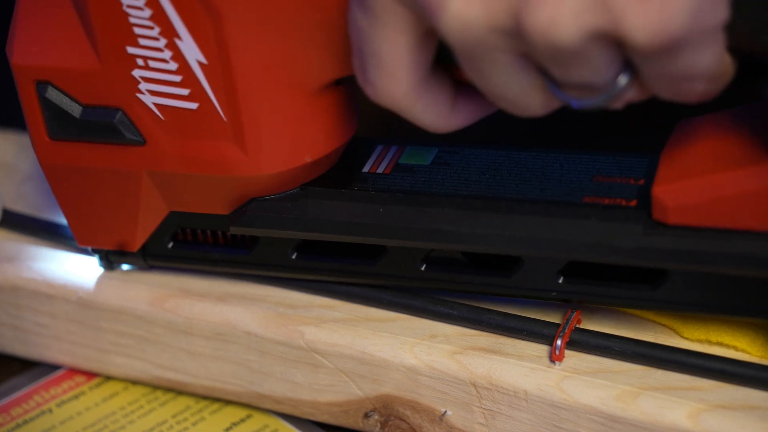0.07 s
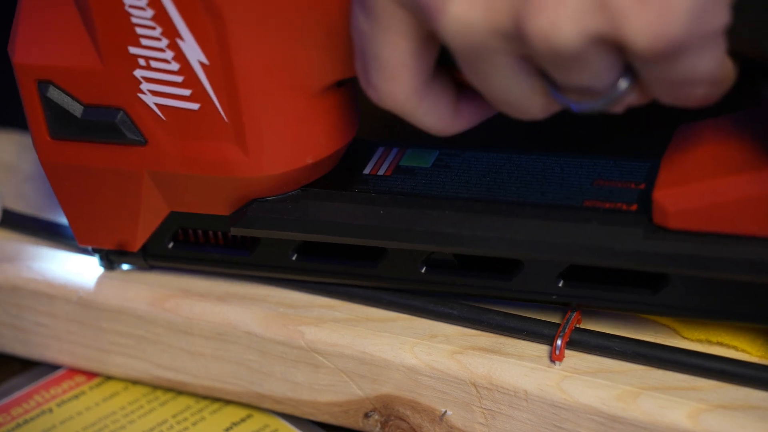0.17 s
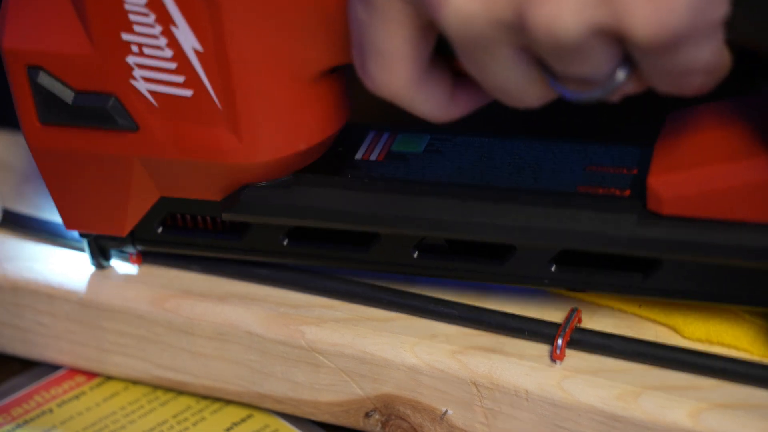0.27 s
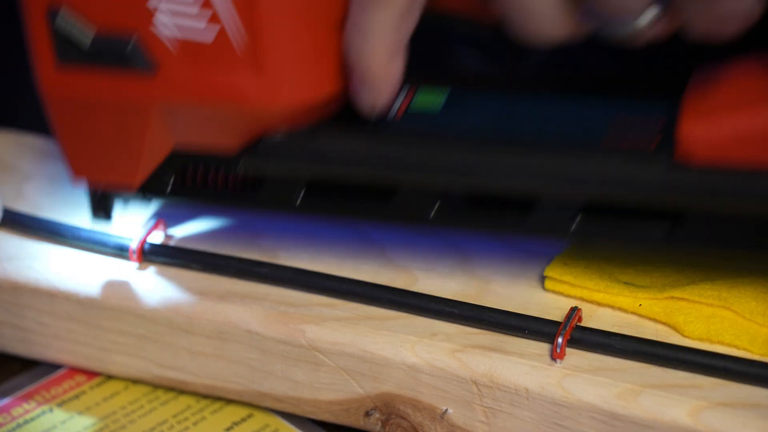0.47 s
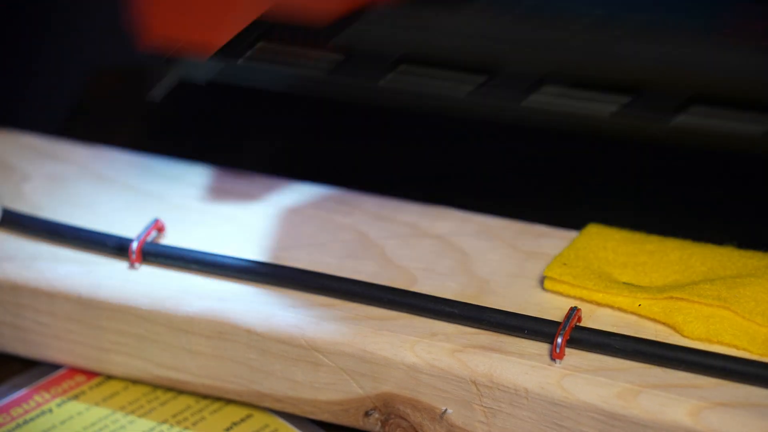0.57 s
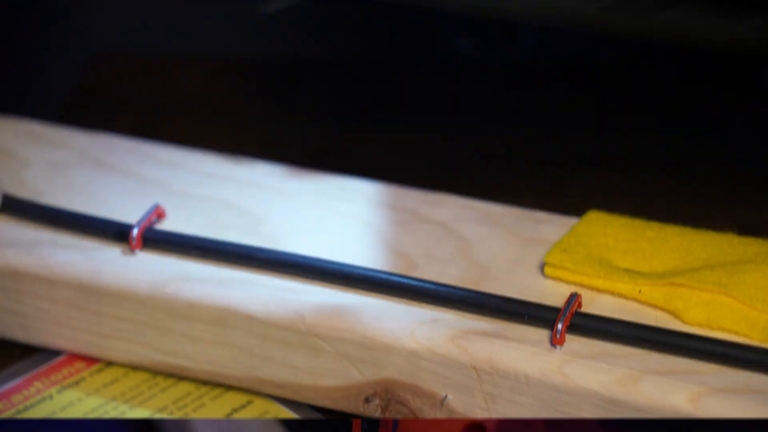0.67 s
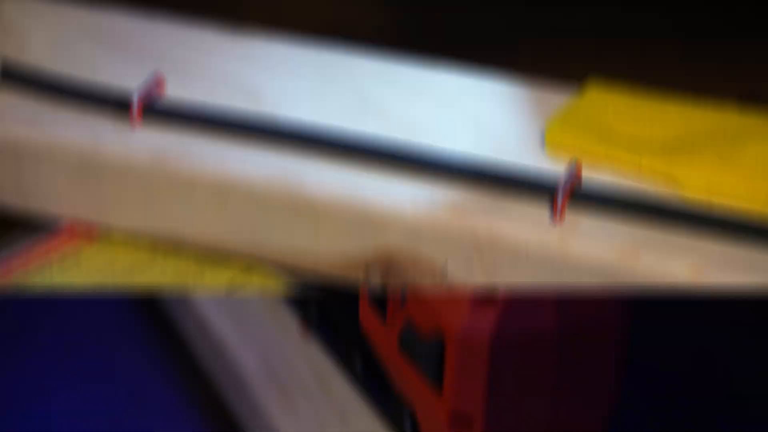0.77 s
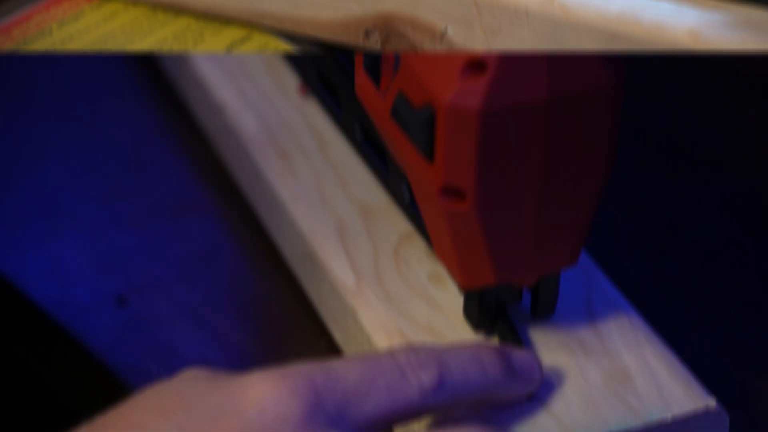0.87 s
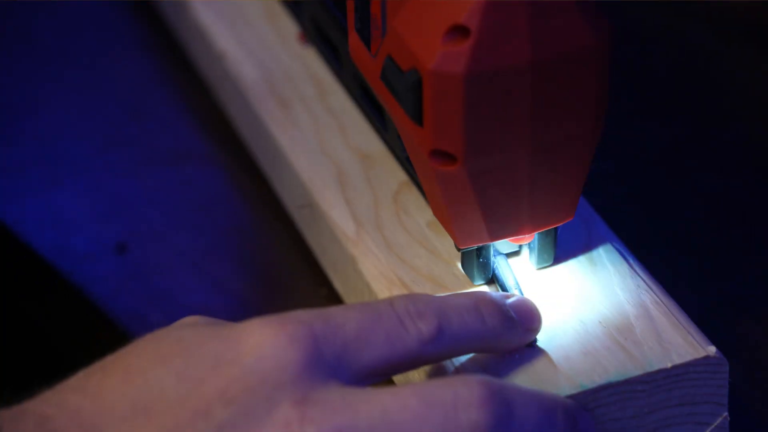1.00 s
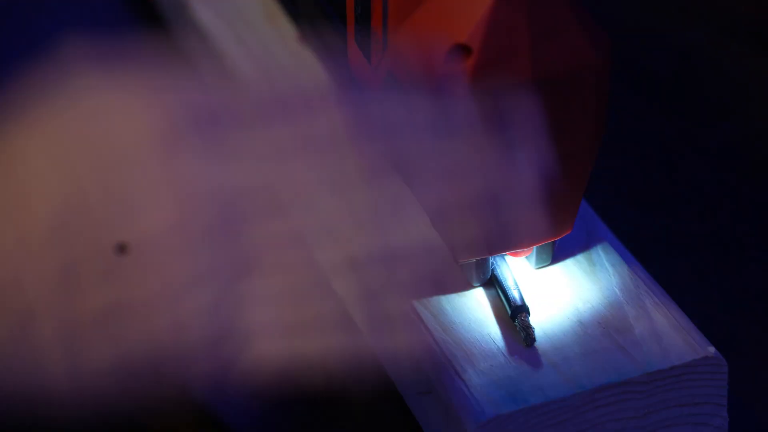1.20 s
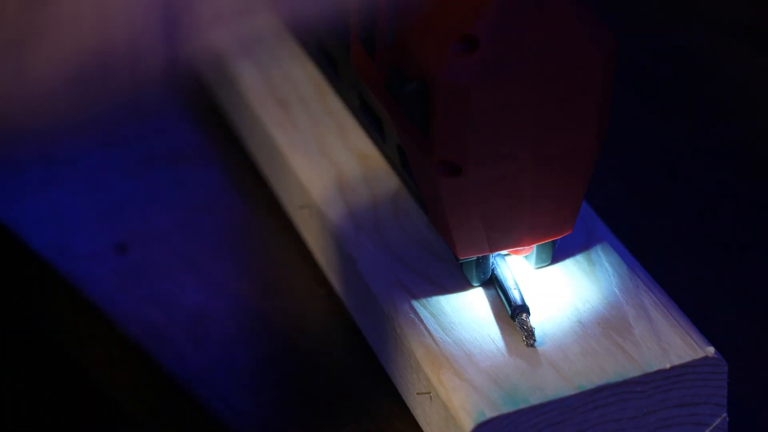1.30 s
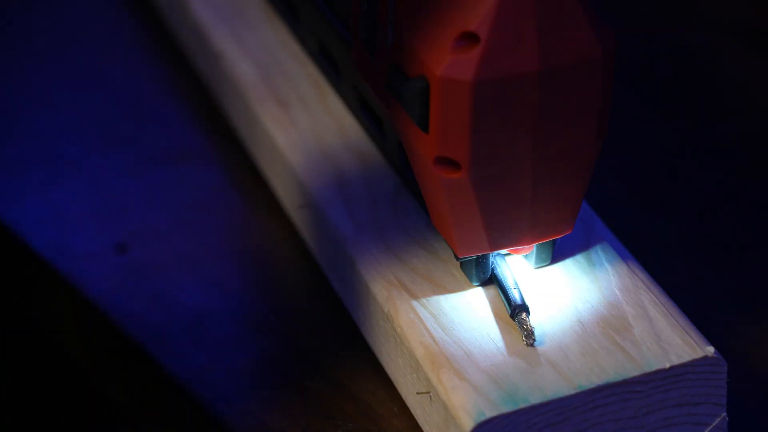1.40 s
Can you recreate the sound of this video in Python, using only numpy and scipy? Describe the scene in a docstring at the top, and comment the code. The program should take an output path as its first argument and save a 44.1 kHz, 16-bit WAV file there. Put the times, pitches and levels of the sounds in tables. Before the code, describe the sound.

A cordless stapler whirs briefly, then fires into a wooden board with a sharp crack and a low thud. Faint clicks, knocks and a dull bump follow as tool and board are handled, close up in a quiet workshop.

```python
"""A short motor whir and a sharp crack: a cordless stapler fires into a wooden board, close up.
Whining gears wind a spring, the striker hits the staple and rebounds, the board booms,
and the spring rings on as the motor stops. Then tool and board are handled in the small,
quiet workshop: light clicks, a short scuff and a dull bump."""
import sys
import numpy as np
from scipy import signal
from scipy.fft import rfft, irfft
from scipy.io import wavfile
from scipy.ndimage import uniform_filter1d

SR = 44100
rng = np.random.default_rng(int(sys.argv[2]) if len(sys.argv) > 2 else 0)


def generate_wav(signal):
    """Clip the signal to [-1, 1] and save it as 16-bit WAV at the path in sys.argv[1]."""
    frames = np.transpose(np.atleast_2d(signal))
    scaled = np.clip(frames, -1, 1) * 32767
    pcm = np.round(scaled).astype(np.int16)
    wavfile.write(sys.argv[1], SR, pcm)


N = 63945

FIRE_S = .2405  # the spring is let go
CONTACT_S = .0004  # attack of a hard knock


def undb(db):
    """Decibels to gain."""
    return 10 ** (np.asarray(db) / 20)


def since(start):
    """Seconds since a moment, zero before it."""
    return np.maximum(np.arange(N) / SR - start, 0)


def fall(start, t60):
    """Full level until a moment, then a decay of 60 dB every t60 seconds."""
    return np.exp(-np.log(1000) * since(start) / t60)


def rise(start, length):
    """Silence until a moment, then a smooth rise to full level."""
    return 1 - np.exp(-(since(start) / length) ** 2)


def hump(centre, width):
    """A smooth swell and fade around a moment."""
    return np.exp(-.5 * ((np.arange(N) / SR - centre) / width) ** 2)


def burst(start, t60, tail_db, tail_t60):
    """Envelope of a contact: a quick decay and the room's longer tail."""
    direct = rise(start, 0.001) * fall(start, t60)
    tail = undb(tail_db) * rise(start, 0.002) * fall(start, tail_t60)
    return np.hypot(direct, tail)


def colour(x, points):
    """Shape a sound with an EQ curve that rolls off steeply beyond its ends; rms 1."""
    hz, db = np.array(points, float).T
    f = np.maximum(np.arange(N // 2 + 1) * SR / N, 1)
    curve = undb(np.interp(np.log(f), np.log(hz), db))
    skirts = 1 / np.sqrt((1 + (hz[0] / 2 / f) ** 4) * (1 + (f / hz[-1] / 2) ** 8))
    y = irfft(rfft(x) * curve * skirts, N)
    return y / np.std(y)


def noise(points):
    """Coloured noise of rms 1."""
    return colour(rng.standard_normal(N), points)


def ring(start, modes):
    """Damped modes struck at one moment."""
    return sum(undb(db) * np.sin(2 * np.pi * hz * since(start)) * fall(start, t60)
               for hz, db, t60 in modes)


def room_tone():
    """The faint low rumble of the workshop."""
    # Room EQ. Each row: frequency in Hz, gain in dB.
    room_eq = [(25, -3.5), (60, 0), (150, -8.5), (700, -26.5), (15500, -39)]
    return undb(-64) * noise(room_eq)


def scuff():
    """A short, squeaky rub that swells into the first bump."""
    # Friction EQ. Each row: frequency in Hz, gain in dB.
    scuff_eq = [(300, -9), (1400, -10.5), (1700, 5.5), (1830, 0), (2050, -15), (7000, -47)]
    return undb(-48.5) * noise(scuff_eq) * rise(1.1, 0.046) * fall(1.177, t60=0.14)


def handling_knocks():
    """Each knock layers a wooden thud, a plastic clack and a tick that rings the metal magazine."""
    # Knocks. Each row: start in seconds, wood in dB, plastic in dB, clack pitch ratio, metal in dB.
    knocks = [(0.7011, -39, -43, 0.94, -47), (.731, -51, -50, 1.25, -53.5), (0.7620, -49, -41, 1.14, -50),
              (0.788, -76, -48.5, 1.27, -48.5), (0.828, -44.5, -56, 1.03, -85),
              (0.858, -57, -47, 1.06, -76), (0.9594, -49, -41.5, 0.98, -75), (0.978, -46, -64, 0.46, -79),
              (1.1719, -35.5, -43, 1.116, -63), (1.343, -65, -50.5, 0.93, -80),
              (1.3718, -57.5, -39, 1.145, -75)]
    # EQs of wood, plastic and metal. Each row: frequency in Hz (before any pitch ratio), gain in dB.
    wood_eq = [(90, -15), (220, -7.5), (272, 1.5), (310, -10), (370, -5.5), (560, -5), (750, -18.5),
               (1200, -26), (3000, -47.5)]
    clack_eq = [(300, -1.5), (900, -7.5), (1250, 0), (1800, -8), (2300, -11.5), (3200, -27.5), (7000, -60)]
    tick_eq = [(1500, -11), (3400, 2), (8500, -8.5), (15500, -23)]
    # Ring of the plastic shell. Each row: base frequency in Hz, relative level in dB, t60 in seconds.
    shell_modes = [(1567, 1.5, 0.023)]
    # Ring of the magazine. Each row: frequency in Hz, relative level in dB.
    magazine_modes = [(1290, 0), (3110, -13), (5040, -19.5)]
    out = 0
    for start, wood_db, plastic_db, pitch, metal_db in knocks:
        clack = noise([(hz * pitch, db) for hz, db in clack_eq])
        clack *= burst(start, t60=.028, tail_db=-12.5, tail_t60=.36)
        shell = ring(start, [(hz * pitch, db, t60) for hz, db, t60 in shell_modes])
        plastic = clack + rise(start, CONTACT_S) * shell
        tick = noise(tick_eq) * burst(start, t60=0.021, tail_db=-13.5, tail_t60=0.16)
        metal = tick + ring(start, [(hz, db, 0.091) for hz, db in magazine_modes])
        wood = noise(wood_eq) * burst(start, t60=0.26, tail_db=-10.5, tail_t60=0.64)
        out += undb(wood_db) * wood + undb(plastic_db) * plastic + undb(metal_db) * metal
    return out


def light_ticks():
    """Tiny, bright ticks: the trigger clicks, then the mechanism ticks faintly after the shot."""
    # Ticks. Each row: start in seconds, level in dB, centre frequency in Hz.
    ticks = [(0.104, -57.5, 7900), (.517, -65, 11000), (0.941, -68.5, 3870)]
    out = 0
    for start, db, hz in ticks:
        band = noise([(hz / 2, -20), (hz, 0), (hz * 2, -20)])
        out += undb(db) * band * (since(start) > 0) * fall(start, t60=0.068)
    return out


def board_bumps():
    """Dull bumps ring the board's low modes with a soft attack."""
    # Bumps. Each row: start in seconds, level in dB.
    bumps = [(1.172, -20), (1.2203, -29.5), (1.281, -43), (1.385, -43.5)]
    # Modes of the bumped board. Each row: frequency in Hz, relative level in dB, t60 in seconds.
    modes = [(92.9, -20, 1), (137.8, -8, 0.28), (167, -2, 0.16), (271.4, 0, 0.094), (363, -13, 0.12)]
    return sum(undb(db) * rise(start, 0.0069) * ring(start, modes) for start, db in bumps)


def motor():
    """Gear teeth whine upward as they wind the spring, and rattle and hiss until the motor brakes."""
    # EQs of the gears' rattle in the housing and their hiss. Each row: frequency in Hz, gain in dB.
    rattle_eq = [(130, -15), (260, -5), (750, -15.5), (1100, -4), (1500, -6.5), (1850, 0.5), (2500, -7),
                 (3150, -0.5), (3900, -8), (6000, -20.5), (16000, -44.5)]
    hiss_eq = [(4500, -7.5), (6500, 0), (10300, 3.5), (12500, -15.5), (16000, -21)]
    on_s, off_s, spin_up_s = .1065, 0.4, .055
    full_mesh_hz, roughness, teeth_per_turn = 2022, .012, 6.4
    speed = 1 - np.exp(-since(on_s) / spin_up_s)
    wobble = uniform_filter1d(rng.standard_normal(N), size=120)
    mesh_hz = full_mesh_hz * speed * (1 + roughness * wobble / np.std(wobble))
    phase = 2 * np.pi * np.cumsum(mesh_hz) / SR
    throb = 1 + .35 * np.cos(phase / teeth_per_turn)
    tone = np.sqrt(2) * (np.sin(phase) + undb(-6) * np.sin(2 * phase))
    whine = undb(-29.5) * speed * throb * tone * fall(FIRE_S, t60=0.42)  # fades once unloaded
    tooth = (phase / (2 * np.pi)).astype(int)
    tooth_force = undb(3.4 * rng.standard_normal(N))[tooth]
    contacts = rng.standard_normal(N) * tooth_force * (1 + np.cos(phase)) * (speed > 0)
    rattle = undb(-28.5) * colour(contacts, rattle_eq)
    hiss = undb(-40.5) * rise(on_s, 0.038) * colour(contacts, hiss_eq)
    running = rise(on_s, 0.041) * fall(off_s, t60=0.16)
    return running * (rattle + hiss + whine)


def drive_spring():
    """The released spring hums on after the shot."""
    # Spring modes. Each row: frequency in Hz, level in dB, t60 in seconds.
    modes = [(143, -48.5, 1), (215.3, -33.5, 1.1), (289, -35, 1.1), (439, -30.5, .72), (525, -43, .6)]
    return ring(FIRE_S, modes)


def shudder():
    """The housing trembles as the spring tightens, then the shot shakes tool and bench."""
    # Shudder EQ. Each row: frequency in Hz, gain in dB.
    shudder_eq = [(90, -21), (190, 4.5), (230, -2.5), (320, -5), (450, -1), (650, -8), (900, -13),
                  (1150, -14), (1700, -9.5), (2600, -30.5)]
    strain = undb(-37.5) * rise(0.17, 0.0043)
    recoil = undb(-17) * rise(FIRE_S, 0.02)
    return (strain + recoil) * noise(shudder_eq) * fall(0.37, t60=0.22)


def board_boom():
    """The board booms after the shot; the tool lands and damps it, and the boom dies as it lifts off."""
    # Modes of the board on its bench, and the hollow knock of the landing tool.
    # Each row: frequency in Hz, relative level in dB, free t60 in seconds.
    board_modes = [(98, -25.5, 0.92), (189.3, 1, 0.5), (265.6, -7, 0.45), (364, -18, 0.94),
                   (448, -17.5, 0.4), (563, -17.5, 0.25)]
    landing_modes = [(446.5, -13, .09)]
    start, swell_s, land_s, lift_s = FIRE_S + .019, 0.033, .338, 0.47
    boom = undb(-4.5) * rise(start, swell_s) * ring(start, board_modes)
    damping = undb(-3.5 * rise(land_s, swell_s)) * fall(lift_s, t60=0.19)
    return boom * damping + ring(land_s, landing_modes)


def striker_blows():
    """The striker hits its stop and rebounds, clattering and ringing the nose."""
    # Blows. Each row: start in seconds, ring in dB, ring time ratio, pitch ratio, clatter in dB.
    blows = [(0.2423, -14.5, 1.8, 1.23, -13), (0.2427, 0, 0.71, 0.99, -3.5),
             (0.2533, -9.5, 1.4, 1.07, -26.5), (0.27, -13.5, 0.4, 1.32, -22),
             (0.2911, 1.5, 0.28, 1.14, -19), (0.3125, 0, 0.24, 1.11, -28), (0.447, -27.5, 0.45, 1.1, -32.5)]
    # Nose and housing modes. Each row: base frequency in Hz, relative level in dB, base t60 in seconds.
    nose_modes = [(586.5, -10, 0.076), (1217, -19, 0.28), (1399, 0.5, 0.05), (1604, -3, 0.089),
                  (1740, -15, 0.043), (2690, -17.5, .06), (3566, -22, .04), (4550, -13, 0.022)]
    # Clatter EQ. Each row: frequency in Hz, gain in dB.
    clatter_eq = [(40, -15.5), (200, 4), (600, -5.5), (900, -6.5), (1400, 0), (2500, -4.5), (5000, -12),
                  (9000, -20.5), (15500, -28.5)]
    out = 0
    for start, ring_db, sustain, pitch, clatter_db in blows:
        modes = [(hz * pitch, db, t60 * sustain) for hz, db, t60 in nose_modes]
        nose = rise(start, CONTACT_S) * ring(start, modes)
        clatter = noise(clatter_eq) * burst(start, t60=0.049, tail_db=-14.5, tail_t60=.16)
        out += undb(ring_db) * nose + undb(clatter_db) * clatter
    return out


def staple_crack():
    """The striker meets the staple: a bright snap with a very short tail."""
    # Crack EQ. Each row: frequency in Hz, gain in dB.
    crack_eq = [(1500, -11.5), (3500, -7), (5200, -9), (6800, 1.5), (8000, -9), (10000, -17.5),
                (15500, -28)]
    hit_s = .2424
    snap = hump(hit_s, width=0.00039)
    tail = undb(-7.5) * rise(hit_s, 0.0018) * fall(hit_s, t60=0.021)
    return noise(crack_eq) * (snap + tail)


def scene():
    """The stapler and its handling over a quiet room, in mono."""
    stapler = motor() + staple_crack() + striker_blows() + board_boom() + shudder() + drive_spring()
    handling = scuff() + handling_knocks() + light_ticks() + board_bumps()
    return (stapler + handling + room_tone())[None]


def record(dry):
    """Thin the deep bass, soft-clip the peaks of the shot and cut the top."""
    low_cut_hz, top_hz = 99, 16000
    thin = signal.sosfilt(signal.butter(2, low_cut_hz, "high", fs=SR, output="sos"), dry)
    clipped = thin / (1 + thin ** 6) ** (1 / 6)
    return signal.sosfilt(signal.ellip(10, .2, 90, top_hz, fs=SR, output="sos"), clipped)


dry = scene()
out = record(dry)
generate_wav(out)
```